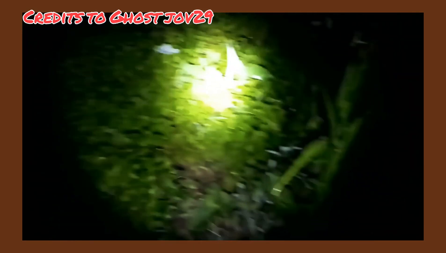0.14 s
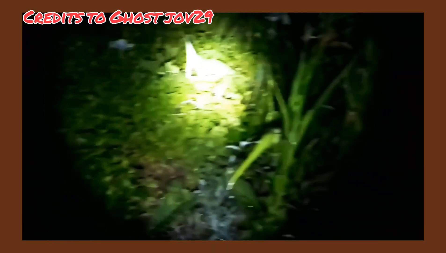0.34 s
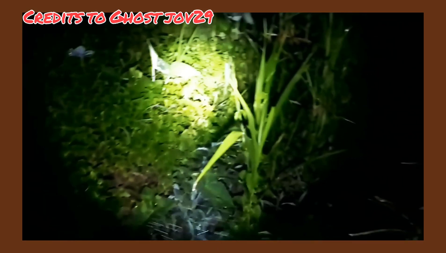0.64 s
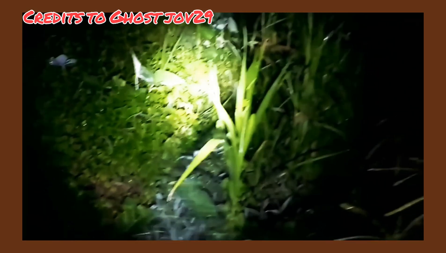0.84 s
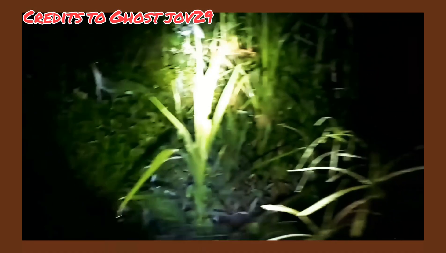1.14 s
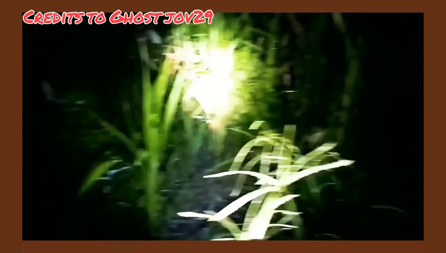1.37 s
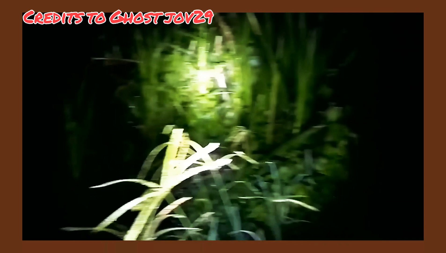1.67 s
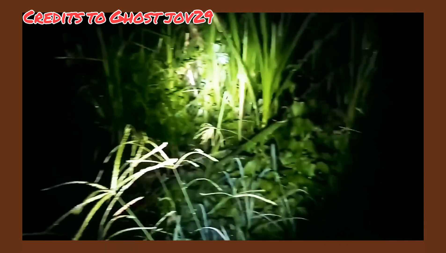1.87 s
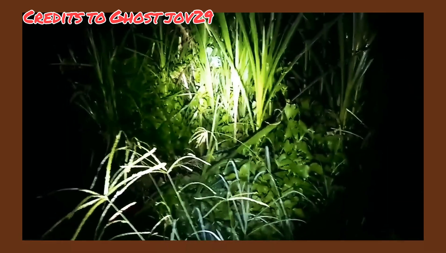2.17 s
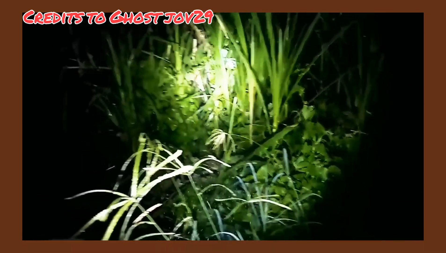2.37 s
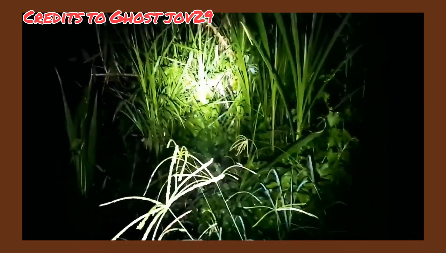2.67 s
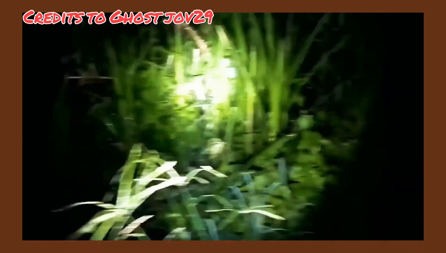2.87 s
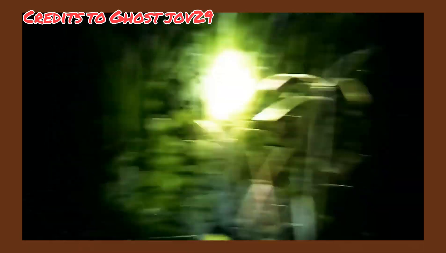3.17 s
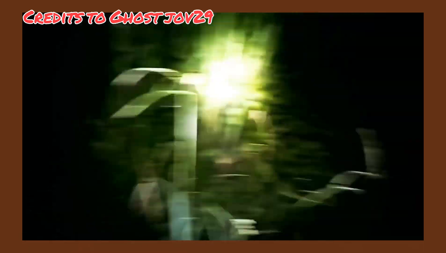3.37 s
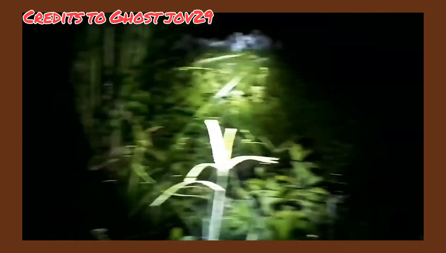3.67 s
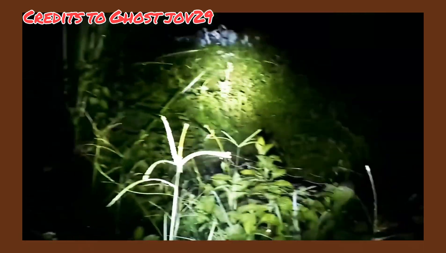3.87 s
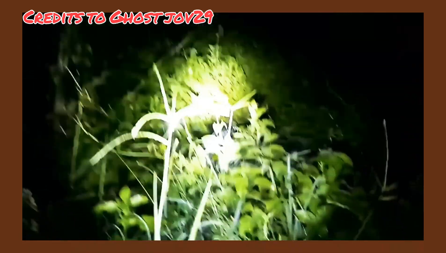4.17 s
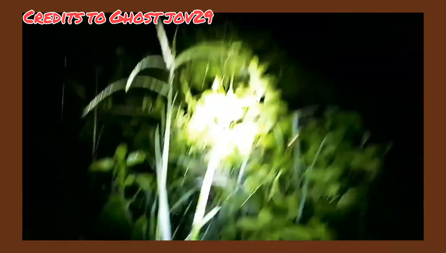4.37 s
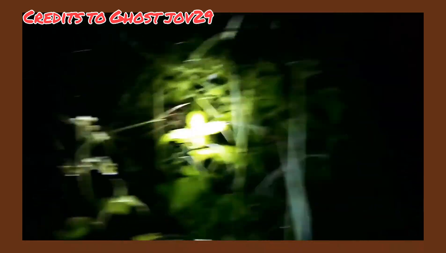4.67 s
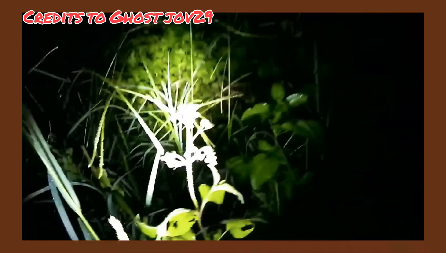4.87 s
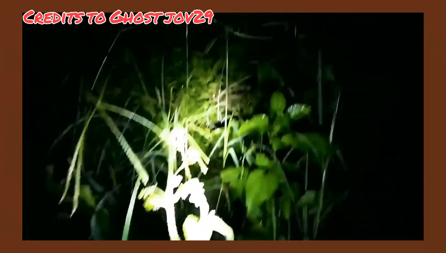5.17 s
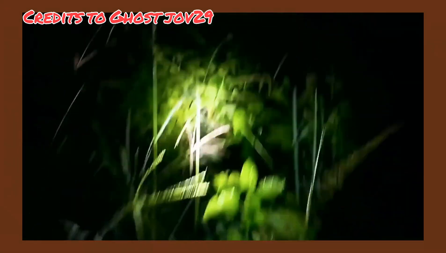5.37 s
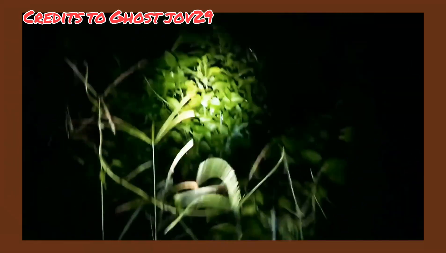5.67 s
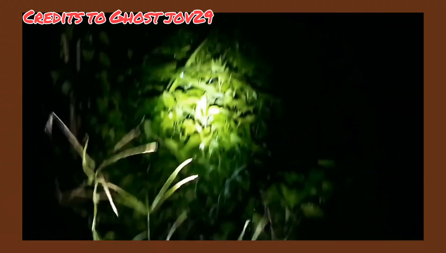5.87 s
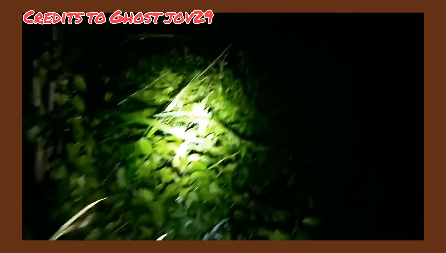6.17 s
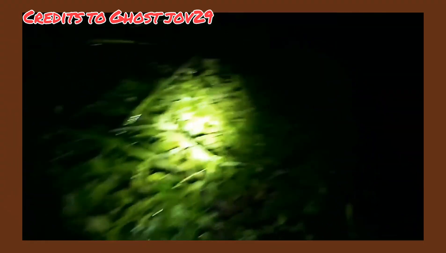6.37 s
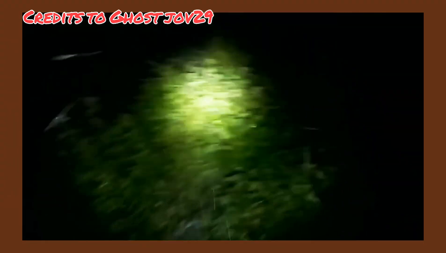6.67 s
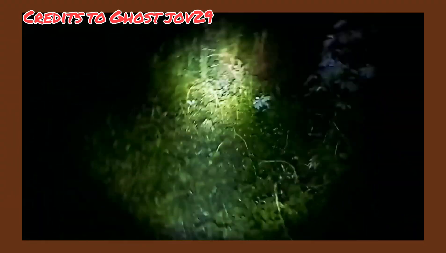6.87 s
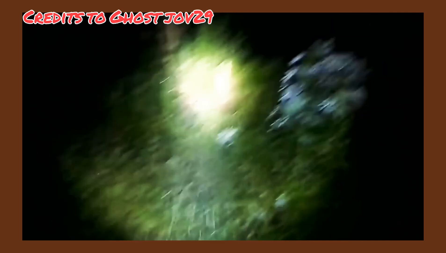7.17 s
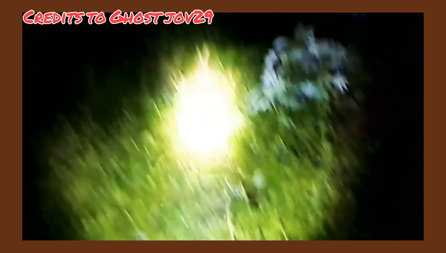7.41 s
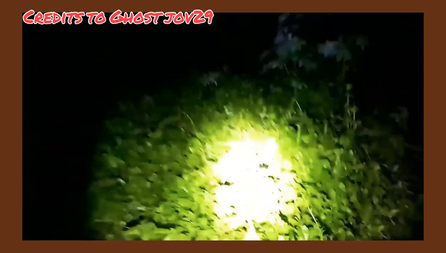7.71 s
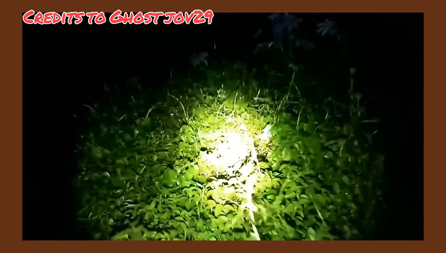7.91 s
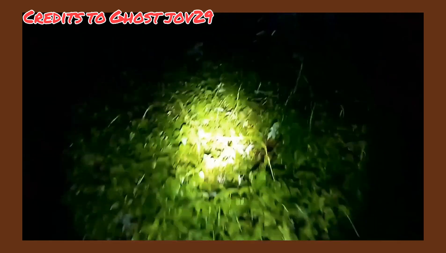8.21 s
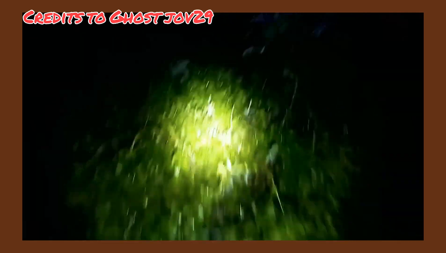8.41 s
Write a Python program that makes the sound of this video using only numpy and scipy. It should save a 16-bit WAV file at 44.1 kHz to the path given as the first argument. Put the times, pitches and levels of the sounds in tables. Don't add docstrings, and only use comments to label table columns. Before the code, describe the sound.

Throughout, a dense chorus of ground crickets chirps around 6 kHz, glittering and slightly uneven, over a far katydid hiss. Tree crickets near 3.5 kHz trade trills of roughly a third of a second, each a rapid flutter of sagging tones, above a blurred distant murmur. Low air and hand rumble stay soft. From 0 to 4 s there are only light grass swishes and a few faint stem ticks. Around 4.1 s walking becomes clearer, with a snap near 4.5, rough rubbery shoe creaks at 4.7 and 5.1, and a strong crackling sweep at 5.4. Grass keeps dragging and rustling from 6 s; chirps surge together near 5.9. A very sharp stem snap strikes at 7.1, followed by busy brushing and dry tearing ticks at 7.5-7.9. Movement eases around 8 s, then the closest ground cricket gives a quick cluster of bright chirps at 8.3-8.5.

```python
import sys
import numpy as np
from scipy import signal
from scipy.fft import rfft, irfft, next_fast_len
from scipy.io import wavfile
from scipy.ndimage import uniform_filter1d, map_coordinates

SR = 44100
rng = np.random.default_rng(int(sys.argv[2]) if len(sys.argv) > 2 else 0)


def materialize(psi):
    bounded = np.clip(np.atleast_2d(psi).T, -1, 1)
    quanta = np.round(bounded * 32767).astype(np.int16)
    wavfile.write(sys.argv[1], SR, quanta)


def nominal_scale(level):
    x = np.asarray(level, float) / 20
    return 10 ** x


N = 376878


def unit(x):
    return x / np.sqrt(np.mean(x ** 2) + 1e-20)


def curves(rows):
    s, *columns = np.transpose(rows)
    return [np.interp(np.arange(N) / SR, s, column) for column in columns]


def wobble(rate, size=N):
    knots = rng.standard_normal(int(size * rate / SR) + 4)
    return map_coordinates(knots, [np.arange(size) * rate / SR])


def bumps(at_s, rise_s, fall_s):
    away = np.arange(0, N + 64, 64) / SR - np.reshape(at_s, (-1, 1))
    return np.exp(-(away / np.where(away < 0, rise_s, fall_s)) ** 2)


def stretched(coarse):
    return np.interp(np.arange(N), np.arange(len(coarse)) * 64, coarse)


def coloured(x, points):
    m = next_fast_len(N + 8192)
    hz, db = np.transpose(points)
    gain = nominal_scale(np.interp(np.log(np.fft.rfftfreq(m, 1 / SR) + 1), np.log(hz + 1), db))
    return unit(irfft(rfft(x, m) * gain, m)[:N])


def crackle(per_second, spread_db, share):
    size_db = spread_db * np.minimum(rng.exponential(size=N), 2)
    ticks = (rng.random(N) < per_second / SR) * rng.standard_normal(N) * nominal_scale(size_db)
    share = np.clip(share, 0, 1)
    return np.sqrt(share) * unit(ticks) + np.sqrt(1 - share) * rng.standard_normal(N)


def patchy(x, depth_db):
    z = signal.stft(x, nperseg=512)[2]
    field = uniform_filter1d(rng.standard_normal(z.shape), 5, 0)
    field = uniform_filter1d(field, 6, 1)
    return signal.istft(z * nominal_scale(depth_db * unit(field)), nperseg=512)[1][:N]


def foliage(x, wet_db, t60):
    t = np.arange(SR // 2) / SR
    tails = rng.standard_normal((3, len(t))) * nominal_scale(-60 * t / t60)
    paths = signal.fftconvolve(x[None], tails / np.linalg.norm(tails), axes=1)[:, :N]
    return x + nominal_scale(wet_db) * sum(wobble(3) * path for path in paths)


def even(x):
    return x / np.sqrt(np.abs(uniform_filter1d(x ** 2, SR // 6)) + 1e-9)


def strokes(t, hz, droop_hz, rate, duty, drift):
    u = np.minimum((t * rate) % 1 / duty, 1)
    sag = droop_hz * duty / rate * (.15 * u - u ** 3 / 3)
    return np.sin(np.pi * u) ** 0.57 * np.sin(2 * np.pi * (hz * t + sag + drift)) * 2.0


def crowd(centre_hz, spread_hz, rate, droop_hz, duty, song_rate, roughness, count):
    t, total = np.arange(N) / SR, np.zeros(N)
    for _ in range(count):
        urge = wobble(song_rate)
        singing = urge > -.3
        song = np.cumsum(np.diff(singing, prepend=False))
        characters = np.clip(rng.standard_normal((200, 3)), -1.7, 1.7)
        pitch, tempo, lag = characters[np.minimum(song, 199)].T
        hz = centre_hz + spread_hz * pitch
        tone = strokes(t + lag, hz, droop_hz, rate * (1 + .04 * tempo), duty, roughness * wobble(60))
        total += np.clip(urge + 0.57, 0, 1) * singing * tone
    return even(total)


# pitch_hz, level_db (per Hz)
NIGHT = [(15, -39), (25, 1.5), (59, 2), (124, -4), (331, -12.5), (525, -19.5), (569, -23), (1060, -30),
         (3000, -30.5), (3900, -53), (6600, -120)]
# time_s, level_db
RUMBLE = [(0, -41), (.1, -49.5), (.8, -48), (1.6, -47.5), (3.0, -49), (5.4, -45.5), (5.95, -53),
          (6.15, -45.5), (6.6, -49), (6.9, -42.5), (7.12, -44), (7.25, -48), (7.8, -48.5), (8.55, -49)]


def night_air():
    rumble_db = curves(RUMBLE)[0] + 0.53 * wobble(5)
    air = coloured(rng.standard_normal(N), NIGHT)
    low = signal.sosfilt(signal.butter(2, 150, fs=SR, output="sos"), air)
    return nominal_scale(-49.5) * (air - low) + nominal_scale(rumble_db + 0.84) * low


# pitch_hz, level_db (per Hz)
KATYDIDS = [(2700, -40.5), (3100, -33), (3900, -21.5), (4300, -33), (5200, -22), (5900, 0.5), (6400, 3),
            (6900, -7.5), (7500, -12), (8700, -14), (9300, -21.5), (10200, -33), (15500, -43),
            (16500, -120)]


def katydids(high_db):
    level_db = 1.13 * (high_db + 30.5) - 31.5 + 1.4 * wobble(4.8)
    return nominal_scale(level_db) * coloured(crackle(3000, 2.5, 0.43), KATYDIDS)


# time_s, level_db
FAR_TREE = [(0, -37.5), (.5, -36), (1, -39.5), (1.7, -38.5), (2.9, -37), (4.2, -34.5), (5.4, -37.5),
            (6.1, -40), (7, -34), (7.7, -36), (8.55, -38.5)]


def distant_tree_crickets():
    far = foliage(crowd(3465, 62, 52.5, 120, .8, 5, .08, count=10), wet_db=0, t60=.4)
    return nominal_scale(curves(FAR_TREE)[0] - 1.5) * even(far)


# start_s, peak_db, pitch_hz
STROKES = [
    (7.0414, -14, 6480),
    (8.2773, -11, 6200),
    (8.3928, -10.5, 6400),
    (8.3984, -18, 6240),
    (8.4218, -9.5, 6390),
    (8.4642, -5.5, 6280),
    (8.4891, -7.5, 6280),
    (8.5324, -10, 6300),
]


def nearest_ground_cricket():
    near, t = np.zeros(N + SR), np.arange(int(0.011 * SR)) / SR
    stroke = (1 - np.exp(-t / 0.00024)) * np.cos(np.pi / 2 * t / t[-1]) ** 0.58
    for s, db, hz in STROKES:
        near[int(s * SR):][:len(t)] += nominal_scale(db - 6.5) * stroke * np.sin(2 * np.pi * hz * t)
    return foliage(near[:N], wet_db=-23.5, t60=.1)


# time_s, chorus_db, low_crowd_share_db
GROUND = [(0, -27.5, -7), (.8, -27, -8), (1.5, -27, -4.5), (2.7, -26, -9), (3.0, -27, -4), (3.6, -26, -10),
          (4.4, -25.5, -4), (5.0, -27, -7), (5.45, -27, -3), (5.75, -28, -5), (6.1, -29, -1),
          (6.4, -26, -6.5), (7.0, -28, -7), (7.3, -28, -10), (7.7, -27, -8), (8.0, -27, 0.5),
          (8.4, -27.5, -7), (8.55, -25.5, -7)]
# time_s, lift_db
SURGES = [(1.76, 0), (3.38, 1.5), (5.81, 4), (5.92, 6), (6.19, 2), (6.31, 1), (7.38, 3.5), (7.52, 0.5),
          (7.78, 5), (7.9, 4), (8.09, 4), (8.23, 2), (8.33, 2)]
SURGE_S, LOW_SURGES, UNREST_DB = 0.014, 0.71, 0.26


def ground_crickets():
    chorus_db, share_db = curves(GROUND)
    at_s, lift_db = np.transpose(SURGES)
    surge_db = stretched(lift_db @ bumps(at_s, SURGE_S, SURGE_S))
    high_db = chorus_db - 2.0 + surge_db + UNREST_DB * wobble(12)
    low_db = chorus_db + share_db + LOW_SURGES * surge_db + 1.25 * wobble(11)
    low = nominal_scale(low_db - 5.0) * crowd(5900, 150, 41, 190, 0.434, 9, 0.28, count=8)
    high = nominal_scale(high_db - 2.5) * crowd(6420, 150, 43, 125, 0.4, 9, 0.3, count=12)
    loudness = nominal_scale(1.1) * np.hypot(nominal_scale(low_db - 4.0), nominal_scale(high_db - 2.5))
    chorus = loudness * even(foliage((low + high) / loudness, wet_db=-3.5, t60=0.18))
    return chorus + nearest_ground_cricket() + katydids(high_db)


# start_s, end_s, first_hz, last_hz, level_db
SQUEAK = [
    (4.7, 4.86, 500, 475, -54),
    (5.05, 5.125, 450, 690, -45),
    (5.115, 5.16, 660, 420, -47),
]


def shoe():
    out = np.zeros(N)
    for start, end, first_hz, last_hz, db in SQUEAK:
        u = np.linspace(0, 1, int((end - start) * SR))
        hz = first_hz + (last_hz - first_hz) * u + 25 * wobble(113, size=len(u))
        phase = 2 * np.pi * np.cumsum(hz) / SR
        creak = 0.37 * np.sin(phase) + 1.5 * np.sin(2 * phase) + 0.77 * np.sin(3 * phase)
        roughness = nominal_scale(db + 3.2 * wobble(90, size=len(u)))
        out[int(start * SR):][:len(u)] += roughness * np.sin(np.pi * u) * creak
    return out


# start_s, peak_db, pitch_hz, t60_s
SNAPS = [(1.469, -27, 2000, .005), (1.573, -31, 1700, .005), (1.893, -34, 4700, .004),
         (3.466, -35, 2000, .004), (4.483, -22, 2000, .005), (4.906, -25, 2300, .005),
         (5.189, -24, 700, .012), (5.554, -20, 1100, .012), (6.172, -22, 900, .008),
         (6.752, -20, 8000, .012), (7.0769, -4, 4800, .0045), (7.0772, -19, 2000, .006),
         (7.084, -26, 4300, .005), (7.118, -30, 70, .05), (7.471, -20, 1700, .008), (7.472, -23, 550, .015),
         (7.487, -22, 800, .012), (7.762, -24, 2000, .005), (7.777, -11, 7000, .03),
         (7.881, -21, 4700, .005), (8.012, -32, 9000, .005), (8.045, -29, 9000, .005),
         (5.356, -15, 7000, .015), (8.33, -27, 1500, .005), (7.702, -19, 8000, .01),
         (7.727, -17, 8000, .015), (6.33, -24, 1500, .006), (1.686, -35, 1700, .005),
         (5.806, -28, 450, .02), (7.0775, -27, 400, .012)]


def snaps():
    out, t = np.zeros(N + SR), np.arange(SR // 10) / SR
    for s, db, hz, t60 in SNAPS:
        tearing = uniform_filter1d(rng.standard_normal(len(t)), size=7) if hz > 6000 else 1
        stiffness = 2.2 if 100 < hz < 3000 else 1.15
        decay = nominal_scale(-60 * stiffness * t / t60)
        onset = (1 - np.exp(-t * hz * stiffness)) ** 2
        ring = tearing * np.sin(2 * np.pi * hz * t) * decay * onset
        out[int(s * SR):][:len(t)] += nominal_scale(db - 2) * ring / np.abs(ring).max()
    return out[:N]


# time_s, effort_db
WALK = [(0, -56.5), (.6, -53), (1.3, -56), (2.5, -59), (3.9, -56), (4.15, -47), (4.58, -53.5), (4.8, -48.5),
        (5.9, -46.5), (6.5, -46), (6.95, -45.5), (7.4, -43.5), (7.85, -44.5), (8.0, -47), (8.55, -47.5)]
# peak_s, length_s, level_db, weight_db, dryness_db
SWEEPS = [(0.37, 0.28, -43, -6, 0), (1.02, 0.11, -44.5, -6, -6), (3.578, .2, -47.5, -29, -3),
          (4.147, 0.22, -43, -23, -1), (4.412, 0.18, -39.5, -9.5, -3.5), (4.936, .08, -39.5, -3.5, -6),
          (5.11, 0.16, -40, -5.5, -18), (5.244, 0.069, -43.5, 2, 2), (5.439, 0.23, -31, -7, -5),
          (5.593, 0.15, -36, -8, -5), (6.048, 0.17, -37, -8.5, 0.5), (6.203, 0.12, -40, -7, -2),
          (6.32, 0.17, -37, -2.5, 2), (6.465, 0.21, -36, -7.5, -3), (6.762, 0.045, -37, -11, 1.5),
          (7.097, 0.14, -39, -5, -5), (7.317, .15, -50, -6, 4), (7.51, 0.085, -33, -4, -11),
          (7.59, 0.18, -36, -9, -2.5), (7.72, 0.089, -45.5, -9, 5), (7.79, 0.045, -49, -9, 1),
          (7.868, 0.07, -40, -13, -1.5), (8.14, 0.11, -55.5, 3, 13.5), (8.365, .12, -40, -7, 2.5)]
# pitch_hz, level_db (per Hz)
LEAVES = [(700, -23), (1200, -8), (2200, -2.5), (2700, -6), (3100, -16.5), (3800, -24.5)]
STEPS = [(80, -2.5), (200, -2), (400, -1.5), (900, -4.5), (1500, -12.5), (2500, -46)]
BLADES = [(2800, -25), (3900, -7.5), (4600, -4.5), (7000, 3.5), (9500, -16.5), (11000, -54)]
TIPS = [(5000, -29), (8000, 11.5), (10500, -2.5), (15500, -8.5), (16500, -120)]
RISE, FALL, FLUTTER_DB = 0.56, 0.57, 1


def brushing():
    s, length, db, weight_db, dry_db = np.array(SWEEPS).T[..., None]
    shape = bumps(s, RISE * length, FALL * length)
    drag = nominal_scale(curves(WALK)[0])

    def stir(sweep_db, drag_db, grows):
        sweep_power = stretched(((nominal_scale(sweep_db) * shape) ** 2).sum(0))
        steady = nominal_scale(drag_db - 49.5) * (drag / nominal_scale(-50.5)) ** grows
        return nominal_scale(FLUTTER_DB * wobble(25)) * np.sqrt(sweep_power + steady ** 2)

    swish = stir(db - 4.5, -1.15, 1.19) * coloured(patchy(crackle(1200, 4.1, 0.26), 2.1), LEAVES)
    steps = stir(db + weight_db - .3, -1.9, 0.91) * coloured(patchy(crackle(400, 4.7, 0.21), 2.6), STEPS)
    blades = stir(db + dry_db + 7, 8.2, 1.0) * coloured(patchy(crackle(1500, 1.3, 0.3), 2.0), BLADES)
    tips = stir(db + 1.4 * dry_db - 5.5, 1.2, 0.6) * coloured(patchy(crackle(1400, 5, 0.048), 2.0), TIPS)
    return swish + steps + blades + tips


# start_s, end_s, pitch_hz (strongest line), strokes_per_s, level_db
TRILLS = [(0.0, 0.327, 3480, 51.5, -37.5), (.4, .8, 3448, 55.7, -41), (1.15, 1.548, 3552, 54.2, -39),
          (1.2, 1.56, 3340, 54.2, -48), (1.85, 2.18, 3452, 53.7, -36.5), (2.14, 2.46, 3506, 52, -34.5),
          (2.42, 2.78, 3620, 51, -38), (2.4, 2.8, 3324, 53, -45.5), (2.85, 3.15, 3475, 51.5, -50),
          (3.18, 3.5, 3497, 53.7, -41), (3.47, 3.93, 3623, 52.7, -37.5), (3.52, 3.91, 3350, 52.5, -40.5),
          (3.75, 4.148, 3450, 52.2, -36), (4.31, 4.695, 3536, 53, -32.5), (4.75, 5.16, 3620, 52.5, -35),
          (4.95, 5.36, 3437, 51.7, -36.5), (5.5, 5.8, 3505, 50.5, -37.5), (5.67, 6.082, 3600, 52.5, -35.5),
          (6.19, 6.638, 3460, 51.5, -35.5), (6.62, 6.912, 3570, 51, -35), (6.7, 6.947, 3416, 51, -37),
          (7.15, 7.32, 3501, 51, -41.5), (7.38, 7.58, 3490, 53, -39.5), (8.2, 8.55, 3465, 51.7, -43)]
HIGH_TRILLS = [(1.22, 1.75, 4112, 67, -59), (2.85, 3.14, 4090, 63, -54), (3.1, 3.34, 4110, 63, -58),
               (3.15, 3.3, 3892, 60, -62), (.33, .46, 5380, 60, -48), (2.02, 2.17, 5327, 70, -41),
               (2.42, 2.54, 5336, 70, -42)]
# pitch_hz, droop_hz (per wing stroke)
DROOP = [(3330, 150), (3440, 105), (3495, 60), (3550, 160), (3625, 155), (3890, 50), (4110, 130),
         (5330, 65)]


def near_tree_crickets():
    near = np.zeros(N + SR)
    for start, end, hz, rate, db in [*TRILLS, *HIGH_TRILLS]:
        droop_hz = np.interp(hz, *np.transpose(DROOP))
        t = np.arange(int((end - start) * SR)) / SR
        ramps = np.minimum((t + .01) / .04, (t[-1] - t) / .025)
        swell = np.minimum(1, ramps) * nominal_scale(2.4 * wobble(25, size=len(t)))
        warm_up = .9 * np.exp(-t / .025) + .045 * wobble(30, size=len(t))
        trill = strokes(t, hz, droop_hz, rate, .83, warm_up)
        near[int(start * SR):][:len(t)] += nominal_scale(db) * swell * trill
    return foliage(near[:N], wet_db=-8, t60=.25)


def scene():
    background = night_air() + distant_tree_crickets() + ground_crickets()
    walker = shoe() + snaps() + brushing()
    return (background + walker + near_tree_crickets())[None]


def roll_off(x):
    return signal.sosfilt(signal.butter(12, 15440, fs=SR, output="sos"), x)


def record(dry):
    return roll_off(dry + .0027)


dry = scene()
out = record(dry)
materialize(out)
```